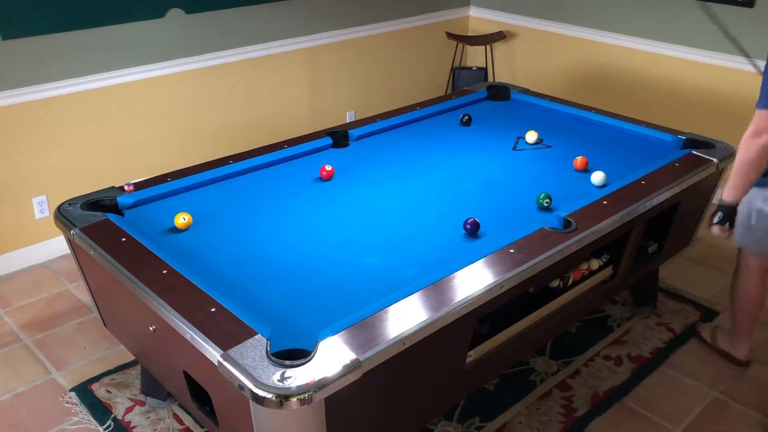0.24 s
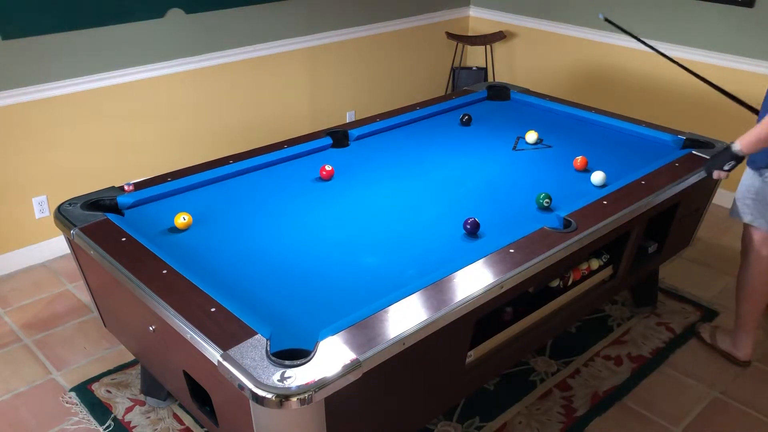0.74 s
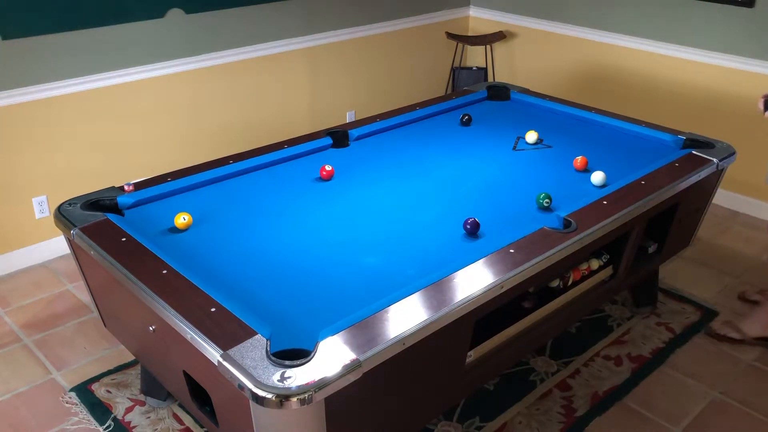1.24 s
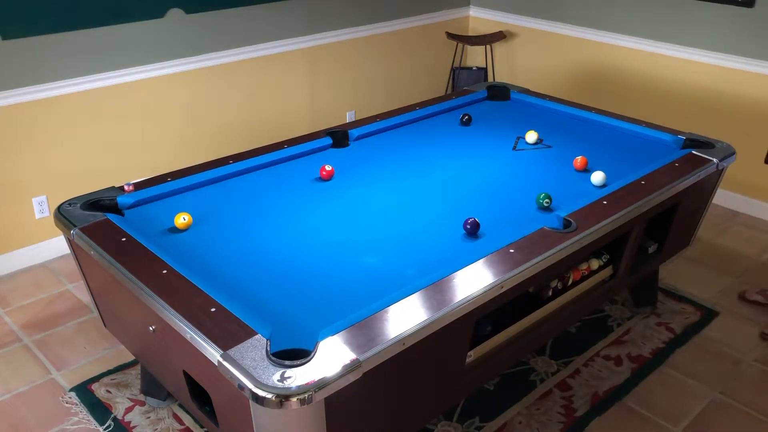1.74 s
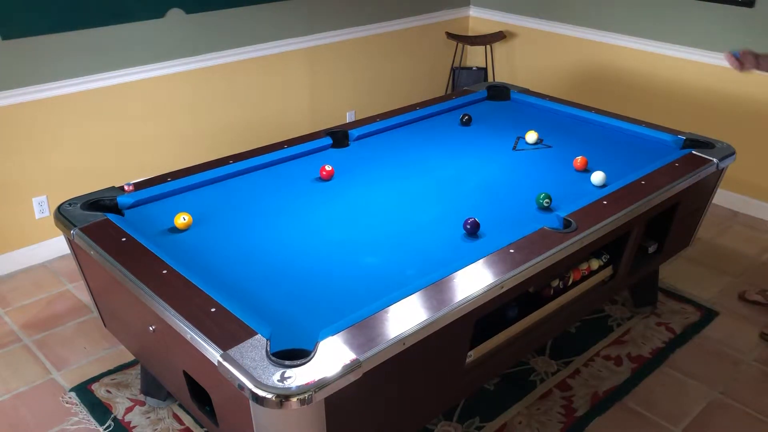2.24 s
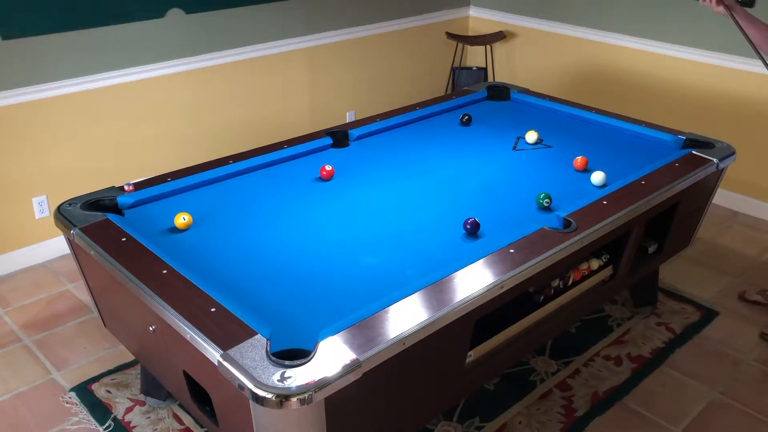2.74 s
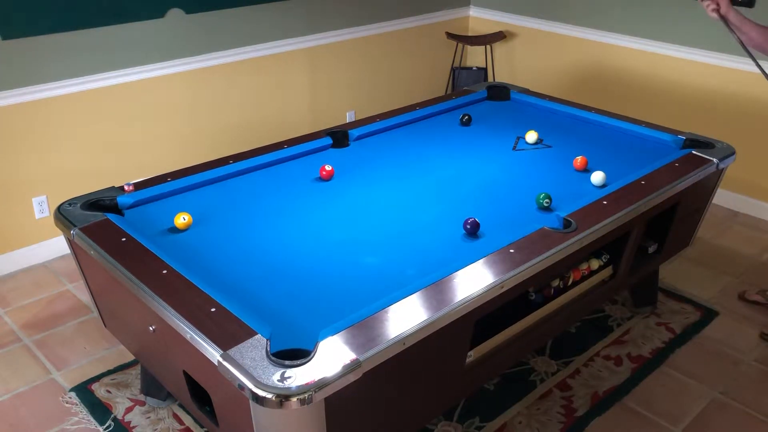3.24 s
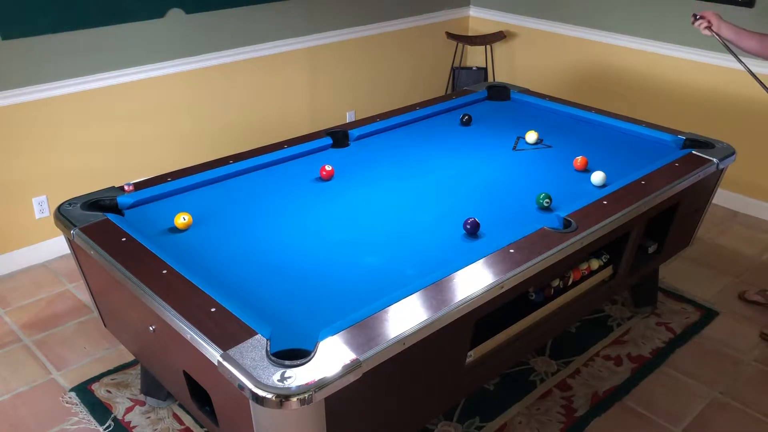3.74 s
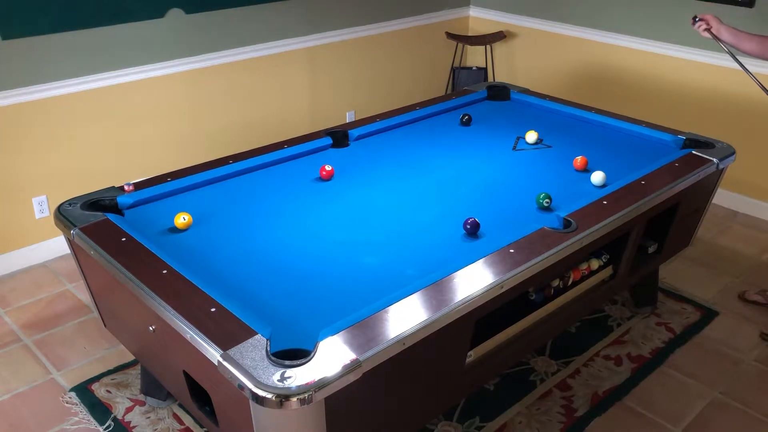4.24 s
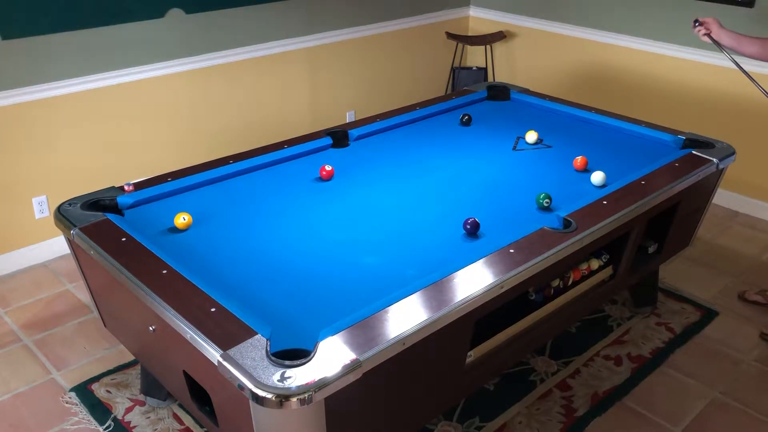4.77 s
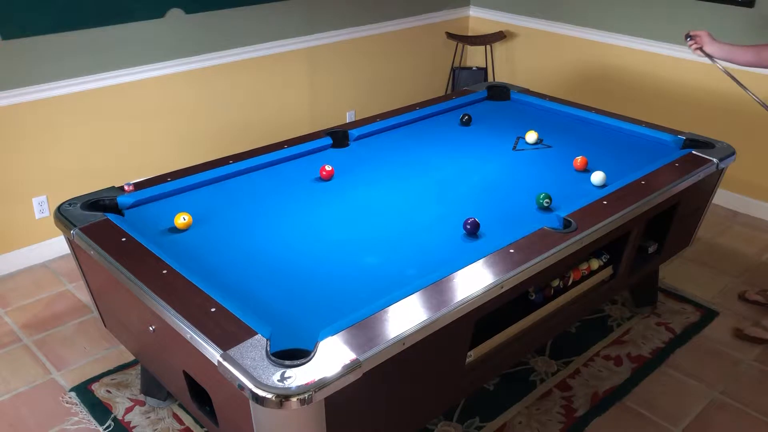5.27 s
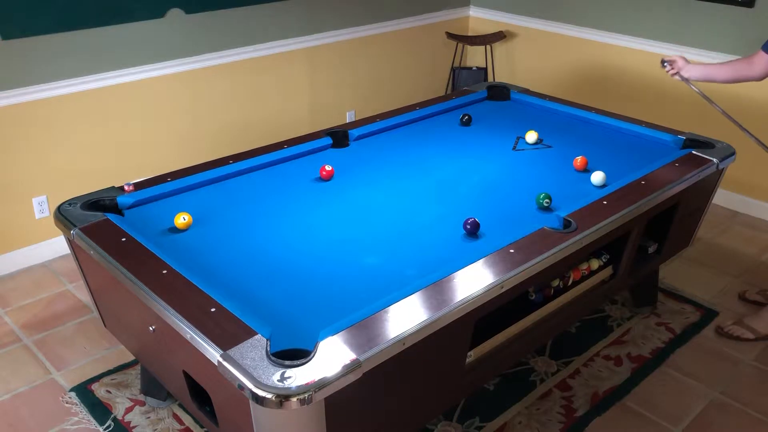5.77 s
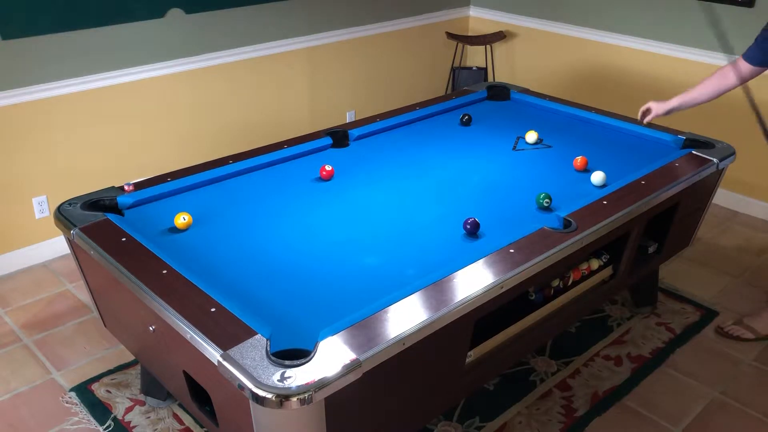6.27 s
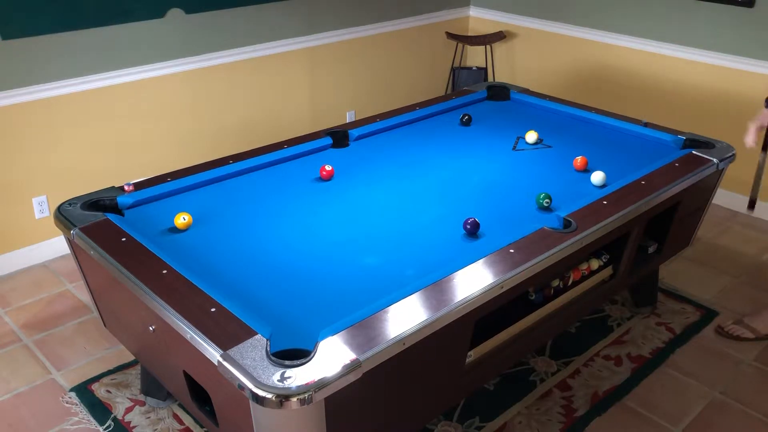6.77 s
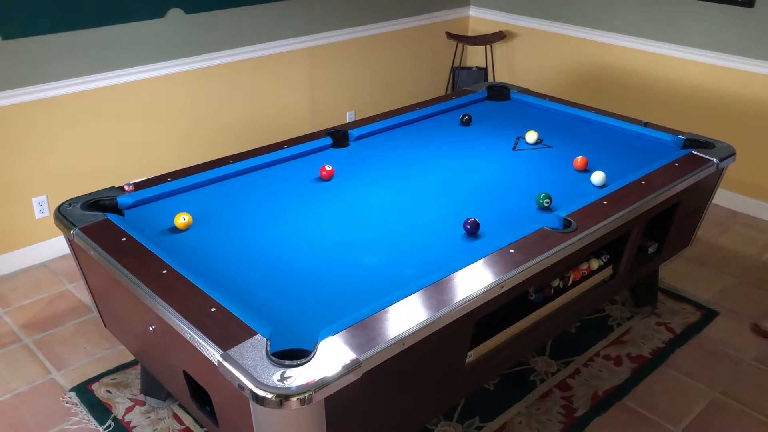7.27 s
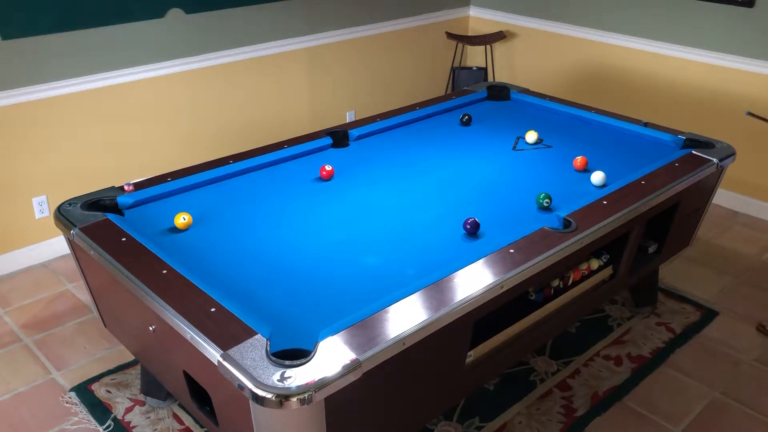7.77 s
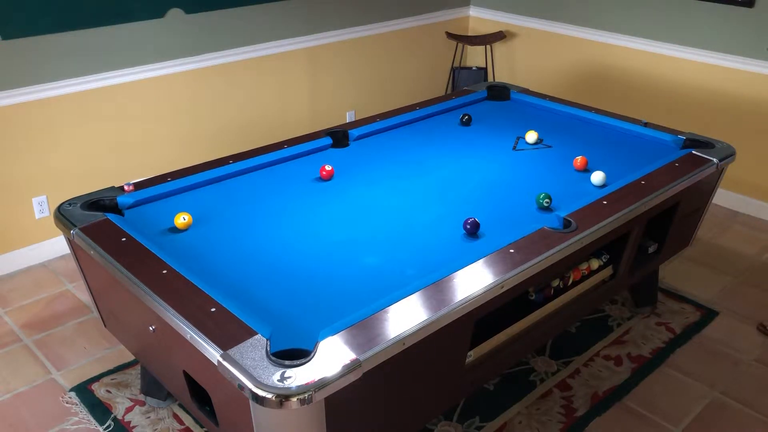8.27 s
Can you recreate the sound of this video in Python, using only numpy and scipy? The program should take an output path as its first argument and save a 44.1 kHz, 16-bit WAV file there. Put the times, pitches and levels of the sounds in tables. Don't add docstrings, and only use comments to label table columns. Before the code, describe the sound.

Boomy wooden knocks and rolling inside a pool table end in two hard thuds, followed by dry chalk scraping and small taps in a live room.

```python
import sys
import numpy as np
from scipy import signal
from scipy.fft import rfft, irfft, next_fast_len
from scipy.io import wavfile
from scipy.ndimage import uniform_filter1d, map_coordinates

SR = 44100
rng = np.random.default_rng(int(sys.argv[2]) if len(sys.argv) > 2 else 0)


def unload_audio(sound):
    columns = np.transpose(np.atleast_2d(sound))
    steps = np.round(np.clip(columns, -1, 1) * 32767)
    wavfile.write(sys.argv[1], SR, steps.astype(np.int16))


def rack_gain(trim_db):
    fader = np.asarray(trim_db, float)
    return 10 ** (fader / 20)


N = 375291

# f/Hz, level/dB
AIR_TONE = [(13, -41.5), (22, -17), (58, 4), (95, 0.5), (169, -8), (229, -7), (310, -11.5), (356, -8),
            (398, -9), (653, -16), (2020, -29), (4030, -26), (4500, -27), (14700, -35), (16000, -38)]
# f/Hz, level/dB
APPLIANCE_HUM = [
    (91.5, -84),
    (226, -73),
    (355, -71.5),
    (3960, -85),
]
# f/Hz, time to fall by 60 dB/s
ROOM_RING = [(60, 1), (250, 0.71), (1000, 0.69), (3000, 0.64), (7000, 0.44), (14000, 0.15)]
COLOUR_BANDS = [80, 280, 620, 1800, 8000]

# start t/s, length t/s, level at the end/dB
SANDAL_DRAGS = [(6.385, 0.091, -71), (6.556, .02, -62.5), (6.96, 0.09, -62.5), (7.1, 0.22, -65),
                (7.33, .07, -64.5), (7.875, 0.17, -77.5), (8.19, 0.084, -78.5), (8.285, .015, -60.5),
                (8.41, .1, -78)]
# f/Hz, level per Hz/dB
SANDAL_HISS_TONE = [(1180, -59), (2000, -11.5), (2760, -27), (3040, -4), (9920, -10), (14900, -12),
                    (16000, -17.5)]
# start t/s, length t/s, level at the end/dB
CHALK_TWISTS = [(3.13, 0.11, -61), (3.23, 0.048, -67), (3.36, 0.061, -52), (3.5, 0.18, -63),
                (3.72, 0.071, -52), (4.1, 0.1, -54), (4.3, 0.16, -67), (4.6, .15, -54), (4.84, .08, -65.5),
                (5.05, 0.086, -51.5), (5.25, 0.032, -63), (5.35, 0.071, -54.5), (5.6, 0.068, -51),
                (5.85, 0.04, -49), (6.05, 0.044, -68), (6.3, .05, -70.5)]
# f/Hz, level per Hz/dB
CHALK_HISS_TONE = [(1180, -26), (2000, -19), (3010, -6.5), (3340, -2), (3610, -2.5), (5490, -3.5),
                   (6700, -6), (9170, -5), (15100, -11), (16000, -19)]
# f/Hz, level per Hz/dB
SCRAPE_TONE = [(290, -28), (500, -7.5), (700, -11), (1050, -4.5), (1300, -5.5), (1550, -4.5), (2000, -2.5),
               (2800, -11.5), (4000, -20.5), (9000, -85)]
# start t/s, length t/s, level at the end/dB
CHALK_BITES = [(3.4, .04, -66), (5.39, .04, -63), (5.59, 0.061, -64.5), (5.87, .045, -53.5)]
# f/Hz, level per Hz/dB
BITE_TONE = [(2500, -40), (4000, -4), (4800, -0.5), (5600, -4), (8000, -12), (16000, -33)]
# f/Hz, width f/Hz, boost level/dB
CUE_MODES = [(597, 19, 4), (1047, 39, 5), (1270, 110, 5.5), (1510, 50, 7), (1880, 30, -11), (2000, 23, 1.5),
             (2650, 73, 5), (3350, 50, -1.5), (8630, 2800, 0.5)]
# t/s, peak level/dB, weight level/dB, hardness level/dB
TAPS = [(5.333, -43.5, -15, 2), (5.811, -49.5, -29, 2), (6.381, -40, -9.5, 2.5), (6.55, -62, -1, 19.5),
        (6.589, -62, -21, 16), (7.017, -65, -8, 21.5), (7.189, -57, -17, 5), (7.352, -47, -12, 1.5),
        (7.387, -42, -10, 8.5), (7.894, -77, 1, 7), (7.982, -71.5, -7.5, 11.5), (8.02, -74, -3, 1.5),
        (8.281, -56.5, -11, 11), (8.446, -69.5, -12, 17.5)]
# f/Hz, level per Hz/dB
TAP_TONE = [(24, -40), (40, -8), (64, -13), (91, -14.5), (231, 19), (269, 22), (570, 7), (918, 5),
            (1590, 3), (3060, -10), (16000, -43)]

# t/s, level/dB, centre f/Hz, width f/Hz, room level/dB
LIGHT_TICKS = [(.358, -45.5, 5500, 3900, -5), (.49, -58, 8000, 4000, 4), (.632, -40, 1095, 300, 18),
               (.96, -61.5, 8560, 4000, 1.5), (1.016, -39.5, 10500, 6900, -1),
               (1.299, -51.5, 10200, 330, 14), (2.359, -61, 2350, 1400, -1), (2.414, -61, 2800, 2500, -3),
               (3.297, -54, 2700, 1300, -9), (7.387, -32.5, 543, 140, -8), (7.39, -40, 1610, 450, 8),
               (7.68, -70, 8100, 690, 0), (.004, -34, 61, 10, 13), (2.9, -56, 61, 7.6, 12),
               (1.299, -21, 2000, 990, -10.5), (1.673, -35, 2000, 810, 7), (2.829, -32.5, 2130, 980, 3),
               (6.59, -54, 2090, 400, 8.5), (.634, -64, 12700, 200, 13), (6.384, -54.5, 140, 65, 12)]
# t/s, level/dB, centre f/Hz, width f/Hz, room level/dB
MORE_KNOCKS = [(.226, -54, 6000, 4400, -11), (.324, -61, 9000, 6000, -6), (.627, -44, 2000, 820, -3),
               (1.008, -56.5, 11000, 6000, -6), (1.028, -54, 7500, 3000, -6), (1.195, -50, 2500, 2200, 0),
               (1.204, -30, 600, 400, -4), (1.217, -43.5, 1410, 600, 3.5), (1.306, -19, 400, 200, -6),
               (1.372, -19, 330, 180, -4), (1.392, -15, 302, 130, -7), (1.455, -23, 380, 170, -6),
               (1.3, -58, 15200, 900, 14), (1.33, -35, 62, 8.9, 13), (1.679, -18.5, 595, 300, -4),
               (2.834, -16, 540, 240, -7.5), (2.858, -22.5, 794, 110, -3), (5.333, -40.5, 1300, 480, -4),
               (5.347, -43, 1290, 540, -2), (5.811, -48, 1400, 900, -6), (6.41, -45, 230, 71, -2),
               (6.549, -50, 4000, 3500, -6), (7.35, -46, 600, 160, -3), (7.35, -51, 1050, 200, -3),
               (7.018, -57, 1700, 900, 6), (5.556, -56, 1400, 700, -6), (5.57, -52, 1300, 700, -6),
               (5.826, -52, 1300, 700, -6), (6.06, -58, 1200, 700, -6), (7.03, -53, 1500, 700, -3),
               (6.376, -56, 2000, 1500, 0), (1.68, -44, 62, 10, 13), (.262, -45, 2500, 2000, 0),
               (1.682, -30, 1700, 900, 3), (5.586, -60, 7000, 5000, 3)]

# start t/s, end t/s, first slip rate f/Hz, last slip rate f/Hz, level/dB
RAIL_SQUEAKS = [(.15, .6, 4030, 3790, -57), (.63, .92, 3850, 3720, -64), (.88, 1.29, 3810, 3900, -63),
                (.26, .4, 6800, 6760, -75), (.63, .75, 8300, 8200, -70), (1.33, 1.56, 13900, 13700, -60),
                (1.36, 1.56, 10200, 9000, -55), (2.2, 2.42, 4480, 4750, -81)]
WOOD_GROANS = [(3.3, 3.52, 774, 698, -58), (3.53, 3.74, 680, 640, -56), (3.54, 3.76, 595, 563, -51.5),
               (3.72, 3.95, 640, 625, -56), (3.74, 3.93, 565, 556, -62)]
SCRAPE_WHISTLES = [(2.61, 2.83, 4420, 4330, -65.5), (2.62, 2.83, 4570, 4520, -62),
                   (2.63, 2.8, 8750, 8650, -77), (3.46, 3.71, 4720, 4730, -65)]
CHALK_SQUEAKS = [(3.367, 3.47, 1312, 1265, -48), (3.37, 3.44, 640, 622, -49.5),
                 (3.39, 3.46, 1990, 2000, -60), (3.367, 3.41, 2660, 2580, -60), (3.5, 3.6, 1290, 1270, -60),
                 (3.72, 3.9, 1275, 1258, -54), (3.722, 3.78, 1285, 1265, -50),
                 (3.72, 3.78, 2550, 2540, -62), (3.725, 3.76, 3150, 3140, -64)]
CLEAR_SQUEALS = [(1.6, 2.33, 2215, 2205, -66.5), (2.36, 2.66, 4760, 4790, -65),
                 (2.4, 2.76, 5400, 5335, -71.5), (2.43, 2.82, 6030, 5960, -68.5),
                 (2.45, 2.74, 6600, 6600, -70.5), (2.45, 2.6, 8300, 8250, -77),
                 (2.42, 2.6, 4150, 4160, -77), (2.52, 2.72, 632, 647, -46.5),
                 (2.53, 2.776, 1950, 1914, -64), (.83, .9, 7600, 7620, -66), (3.002, 3.15, 4625, 4640, -62),
                 (3.16, 3.22, 4630, 4630, -58), (2.46, 2.57, 9560, 9540, -76),
                 (2.95, 3.13, 8950, 9320, -77), (2.28, 2.36, 5050, 5060, -76), (3.07, 3.2, 6220, 6130, -72),
                 (2.26, 2.42, 4640, 4750, -74), (2.47, 2.64, 4790, 4770, -62), (3.46, 3.7, 4700, 4760, -66),
                 (4.279, 4.46, 4665, 4640, -63), (7.31, 7.34, 2650, 2650, -66)]

# f/Hz, width f/Hz, boost level/dB
CABINET_MODES = [(58.6, 35, 12.5), (100.4, 17, 4.5), (157.5, 28, 4.5), (196.5, 8.8, 10), (238.7, 5, 12.5),
                 (315.6, 54, 7), (381, 75, 2.5), (441, 19.6, 4), (560, 33, 3.5), (640, 22, 3.5),
                 (711, 5.4, 2), (793, 17, 6.5), (1020, 19, 3), (1280, 170, 4), (1684, 270, 4.5),
                 (1990, 68, 5), (2150, 16, 7), (2320, 156, 5), (2703, 13, 10), (3290, 42, 6),
                 (3850, 40, -1), (3960, 40, 5.5), (4800, 250, 3), (6250, 50, -12), (10200, 370, -2.5),
                 (13800, 400, 3)]
# t/s, peak level/dB, weight (boom) level/dB, hardness (clack) level/dB
CLUNKS = [(0.003, -20, 5.5, -1), (0.268, -23, -4, -8), (0.363, -23.5, 0.5, -7.5), (0.63, -29, 4, -3.5),
          (0.749, -26, 1, -13.5), (0.873, -38, 11.5, -7), (1.205, -26.5, 8.5, -10.5), (1.298, -18, 7, -3),
          (1.328, -18.5, 5, 3.5), (1.373, -24.5, 10.5, 3.5), (1.391, -18.5, 5.5, -5.5),
          (1.465, -32, 3, 2.5), (1.678, -12.5, -6.5, -7), (2.835, -11, -5.5, -7), (3.296, -38, -7, -11)]
# f/Hz, level per Hz/dB
CLUNK_TONE = [(24, -74), (40, -25), (106, -9.5), (155, -8), (189, -7), (363, 0), (392, -6.5), (467, 4.5),
              (570, -5), (770, -0.5), (1180, -9.5), (3930, -18.5), (16000, -47)]
# t/s, rumble level/dB, looseness (rattle against rumble) level/dB
ROLL_COURSE = [(0, -33.5, -0.5), (.14, -30.5, -19.5), (.3, -32, -19), (.46, -33.5, -16), (.58, -39.5, -22),
               (1.06, -37, -8), (1.19, -42.5, -4), (1.36, -25, -10), (1.5, -29.5, 0.5), (1.67, -40.5, -8),
               (1.85, -37.5, -26), (2.0, -47, -41), (2.5, -47.5, -9), (2.82, -53.5, -10.5),
               (3.0, -41.5, -23.5), (3.28, -56.5, -25), (3.36, -52.5, 0.5), (3.62, -65, -13)]
# f/Hz, level per Hz/dB
ROLL_TONE = [(24, -49.5), (40, -39), (86, -6), (189, -7), (231, -8.5), (377, -2), (444, -5), (540, -2),
             (2000, -27.5), (2600, -40), (4400, -120)]
# f/Hz, level per Hz/dB
RATTLE_TONE = [(290, -39), (500, 1.5), (919, -20), (1230, -6), (1400, -19), (2690, -23), (2980, -24.5),
               (4800, -36), (7420, -42), (16000, -53.5)]
# start t/s, length t/s, level/dB
TROUGHS = [(.05, 0.18, -56), (.3, 0.17, -32.5), (.55, 0.48, -56), (1.04, 0.019, -38), (1.3, 0.34, -53),
           (1.8, 0.92, -44.5), (2.95, 0.11, -53), (4.33, 0.062, -61.5)]
# start t/s, length t/s, level/dB
LAST_ROLL = [(4.29, 0.091, -59.5)]


def unit(x):
    return x / np.sqrt(np.mean(x ** 2) + 1e-20)


def along(points, hz):
    f, v = np.transpose(points)
    return np.interp(np.log(hz + 1), np.log(f + 1), v)


def curves(rows):
    s, *columns = np.transpose(rows)
    t = np.arange(N) / SR
    inside = (t >= s[0]) & (t <= s[-1])
    gate = uniform_filter1d(inside * 1., size=900, mode="nearest")
    return [np.interp(t, s, column) for column in columns] + [gate]


def wobble(rate, size=N):
    knots = rng.standard_normal(size // 40 + 4)
    return map_coordinates(knots, [np.arange(size) * rate / SR])


def filtered(x, response):
    size = next_fast_len(len(x) + 8192)
    spectrum = rfft(x, size) * response(np.fft.rfftfreq(size, 1 / SR))
    return irfft(spectrum, size)[:len(x)]


def causal(x, gain_db):
    gain = rack_gain(gain_db(np.fft.rfftfreq(8192, 1 / SR)))
    cepstrum = irfft(np.log(gain + 1e-6))
    cepstrum[1:4096] *= 2
    cepstrum[4097:] = 0
    ringing = irfft(np.exp(rfft(cepstrum)))
    return signal.fftconvolve(x, ringing)[:len(x)]


def resonant(tone, body, scatter_db):
    centre, width, boost_db = np.transpose(body)[:, :, None]
    boost_db = boost_db + scatter_db * rng.standard_normal(boost_db.shape)

    def gain_db(hz):
        peaks = boost_db / (1 + (2 * (hz - centre) / width) ** 2)
        return along(tone, hz) + np.sum(peaks, axis=0)
    return gain_db


def grains(gain_db, lumps_db, lump_rate):
    force = rng.standard_normal(N) * rack_gain(lumps_db * wobble(lump_rate))
    grid = np.arange(0, SR / 2, 3.)
    gain = rack_gain(gain_db(grid))
    return unit(filtered(force, lambda hz: np.interp(hz, grid, gain)))


def patchy(x, patchy_db):
    z = signal.stft(x, nperseg=1024)[2]
    field = uniform_filter1d(rng.standard_normal(z.shape), size=4, axis=0)
    field = uniform_filter1d(field, size=14, axis=1)
    return unit(signal.istft(z * rack_gain(patchy_db * unit(field)), nperseg=1024)[1][:N])


def strokes(rows, attack_s, swell_db, fall_db_s):
    start, length, db = np.transpose(rows)[:, :, None]
    knots = np.arange(0, N + 64, 64)
    t = knots / SR - start
    bite_db = -30 * np.clip(-t / (attack_s + 0.34 * length), 0, 4)
    press_db = -swell_db * np.clip(1 - t / length, 0, 1)
    fade_db = -fall_db_s * np.clip(t - length, 0, None)
    power = np.sum(rack_gain(db + bite_db + press_db + fade_db) ** 2, axis=0)
    return np.interp(np.arange(N), knots, np.sqrt(power))


def slips(rows, waver, waver_rate, bright, spread, grip_db, overtone_db):
    out = np.zeros(N + SR)
    for start, end, first_hz, last_hz, db in rows:
        size = round((end - start) * SR)
        rate = np.linspace(first_hz, last_hz, size) * (1 + waver * wobble(waver_rate, size=size))
        turns = np.cumsum(rate) / SR
        k = np.arange(1, int(15500 / first_hz) + 1)[:, None]
        strength = np.exp(-.5 * ((k / bright - 1) / spread) ** 2)
        strength = strength + rack_gain(overtone_db * (k - 1) ** 2) * (k > 1)
        stack = strength * np.sin(2 * np.pi * k * turns)
        grip = np.sin(np.pi * (np.arange(size) / size) ** 0.42) ** 0.5
        grip = grip * rack_gain(grip_db * wobble(38, size=size))
        out[round(start * SR):][:size] += rack_gain(db) * grip * stack.sum(axis=0)
    return out[:N]


def tail():
    hz, t, z = signal.stft(rng.standard_normal(SR), SR, nperseg=256)
    fading = z * rack_gain(-60 * t / along(ROOM_RING, hz)[:, None])
    echo = signal.istft(fading, SR, nperseg=256)[1][:SR]
    echo *= 1 - np.exp(-np.arange(SR) / SR / 0.0014)
    return echo / np.linalg.norm(echo)


def blows(events, tone, body, direct_db, crack_db, level_db, thud_db, click_db, click_grows):
    out = np.zeros(N + SR)
    crack_fade = rack_gain(crack_db - 60 * np.arange(150) / SR / .006)
    for s, db, weight_db, hard_db in events:
        answer = tail()
        answer[0] += rack_gain(direct_db)
        answer[:150] += crack_fade * np.diff(rng.standard_normal(151))
        boosts_db = [thud_db, weight_db, 0, hard_db, click_db + click_grows * hard_db]
        colour = list(zip(COLOUR_BANDS, boosts_db))
        ring_db = resonant(tone, body, scatter_db=0.0)
        small_modes = rng.standard_normal(400)

        def blow_db(hz):
            spot_db = along(colour, hz) + 2.94 * map_coordinates(small_modes, [hz / 70])
            return ring_db(hz) + spot_db
        out[round(s * SR):][:SR] += rack_gain(db + level_db) * causal(answer, blow_db)
    return out[:N]


def rubbing(rows, hiss_tone, body, lumps_db, attack_s, swell_db, fall_db_s, scrape_db, scrape_fall):
    hiss = grains(resonant(hiss_tone, body, scatter_db=11.0), lumps_db, lump_rate=110)
    hiss = patchy(hiss, patchy_db=0.5)
    scrape = grains(resonant(SCRAPE_TONE, body, scatter_db=5.5), lumps_db, lump_rate=50)
    scrape = patchy(scrape, patchy_db=1.0)
    brief = strokes(rows, attack_s, swell_db, fall_db_s)
    lasting = strokes(rows, attack_s, swell_db, fall_db_s * scrape_fall)
    return brief * hiss + rack_gain(scrape_db) * lasting * scrape


def house():
    t = np.arange(N) / SR
    hum = np.zeros(N)
    for hz, db in APPLIANCE_HUM:
        loudness = rack_gain(db + 0.5 + 1.5 * wobble(8.3))
        hum += loudness * np.sin(2 * np.pi * hz * t + (1 + hz / 1500) * wobble(16))
    room_modes = [(61, 12, 5), (94, 14, 3)]  # f/Hz, width f/Hz, boost level/dB
    air = grains(resonant(AIR_TONE, room_modes, scatter_db=0), lumps_db=.6, lump_rate=12)
    drift_db = .7 * wobble(1.5)
    return rack_gain(-61.5 + drift_db) * air + hum


def sandals():
    sole = [(1720, 400, 0.87)]  # f/Hz, width f/Hz, boost level/dB
    return rubbing(SANDAL_DRAGS, SANDAL_HISS_TONE, sole, lumps_db=1.5, attack_s=0.025, swell_db=-0.5,
                   fall_db_s=123, scrape_db=-1.5, scrape_fall=0.87)


def chalking():
    return rubbing(CHALK_TWISTS, CHALK_HISS_TONE, CUE_MODES, lumps_db=1.0, attack_s=0.036, swell_db=5,
                   fall_db_s=126.0, scrape_db=-3, scrape_fall=0.57)


def bites():
    rasp = grains(lambda hz: along(BITE_TONE, hz), lumps_db=3.0, lump_rate=220)
    rasp = patchy(rasp, patchy_db=4.0)
    return strokes(CHALK_BITES, attack_s=.02, swell_db=0.0, fall_db_s=200) * rasp


def taps():
    return blows(TAPS, TAP_TONE, CUE_MODES, direct_db=-8.5, crack_db=-13.0, level_db=27.0,
                 thud_db=12.5, click_db=5, click_grows=1.22)


def ticks():
    out = np.zeros(N + SR)
    burst_fade = rack_gain(-60 * np.arange(300) / SR / 0.015)
    for s, db, centre_hz, width_hz, room_db in LIGHT_TICKS + MORE_KNOCKS:
        answer = rack_gain(room_db) * tail()
        answer[:300] += burst_fade * rng.standard_normal(300) / 6
        resonance = np.concatenate(signal.iirpeak(centre_hz, centre_hz / width_hz / 1.38, SR))
        ring = signal.sosfilt([resonance, resonance], answer)
        out[round(s * SR):][:SR] += rack_gain(db + 14.5) * np.sqrt(SR / width_hz) * ring
    return out[:N]


def squeals():
    near = slips(RAIL_SQUEAKS, waver=.015, waver_rate=140, bright=0.94, spread=0.33,
                 grip_db=2.2, overtone_db=-8.0)
    near += slips(WOOD_GROANS, waver=0.038, waver_rate=110.6, bright=0.85, spread=0.4,
                  grip_db=2.5, overtone_db=-34)
    near += slips(SCRAPE_WHISTLES, waver=0.018, waver_rate=150, bright=0.98, spread=0.34,
                  grip_db=1.5, overtone_db=-30.5)
    near += slips(CHALK_SQUEAKS, waver=0.009, waver_rate=120, bright=0.96, spread=0.3,
                  grip_db=1.0, overtone_db=-20)
    near += slips(CLEAR_SQUEALS, waver=0.004, waver_rate=90, bright=0.92, spread=0.31,
                  grip_db=1.2, overtone_db=-20)
    return near + rack_gain(-5) * signal.fftconvolve(near, tail())[:N]


def clunks():
    return blows(CLUNKS, CLUNK_TONE, CABINET_MODES, direct_db=-9.5, crack_db=-25.5, level_db=35.5,
                 thud_db=0.0, click_db=7.5, click_grows=1.93)


def rolling():
    rumble_db, loose_db, gate = curves(ROLL_COURSE)
    rumble = grains(resonant(ROLL_TONE, CABINET_MODES, scatter_db=4.0), lumps_db=2.0, lump_rate=35)
    rattle = grains(resonant(RATTLE_TONE, CABINET_MODES, scatter_db=1.0), lumps_db=2.0, lump_rate=72)
    rattle = patchy(rattle, patchy_db=3.5)
    grit = unit(filtered(rattle, lambda hz: 1 / (1 + (4500 / (hz + 1)) ** 6)))
    grit_db = -26 + 0.29 * loose_db
    contact = rumble + rack_gain(loose_db) * rattle + rack_gain(grit_db) * grit
    track = gate * rack_gain(rumble_db) * contact
    drone = unit(filtered(rng.standard_normal(N), lambda hz: 1 / (1 + ((hz - 240) / 22) ** 2)))
    trough = strokes(TROUGHS, attack_s=0.069, swell_db=1.5, fall_db_s=105.0) * drone
    creep = strokes(LAST_ROLL, attack_s=0.094, swell_db=2.0, fall_db_s=80) * rumble
    return track + trough + creep


def scene():
    table = rolling() + clunks()
    player = taps() + chalking() + sandals()
    return (table + player + ticks() + squeals() + house() + bites())[None]


def band_limit(x):
    return signal.sosfilt(signal.butter(12, 16510, fs=SR, output="sos"), x)


def record(dry):
    def microphone(hz):
        treble = np.where(hz < 15790, 1, rack_gain(-32.5))
        return treble / (1 + (42 / (hz + 1)) ** 4)
    heard = filtered(dry[0], microphone)
    return band_limit(heard[None])


dry = scene()
out = record(dry)
unload_audio(out)
```